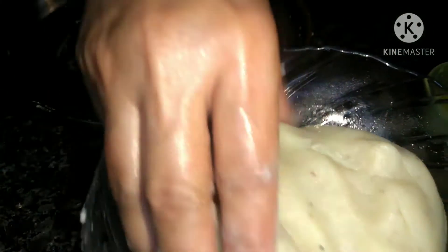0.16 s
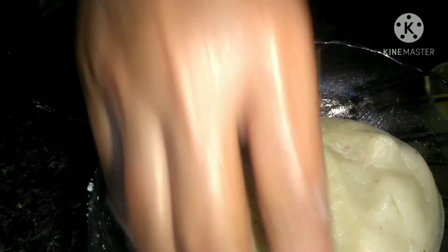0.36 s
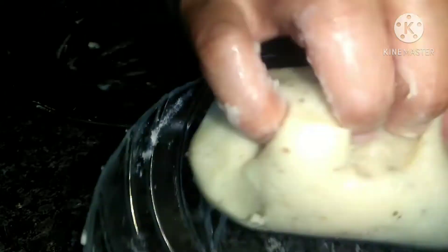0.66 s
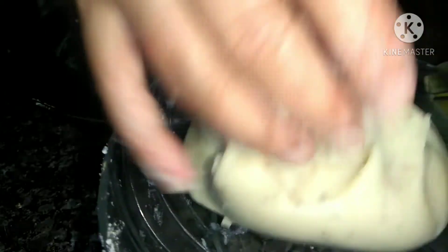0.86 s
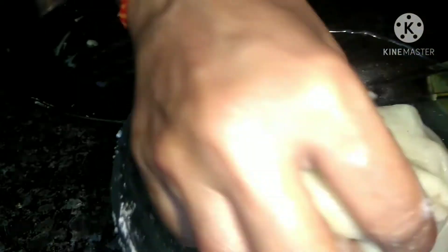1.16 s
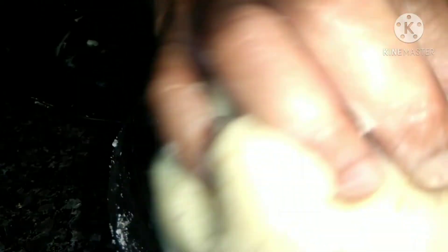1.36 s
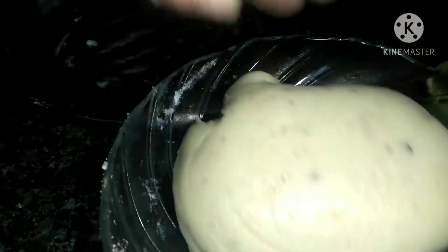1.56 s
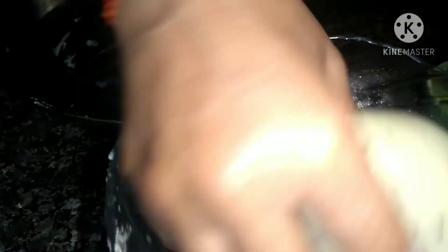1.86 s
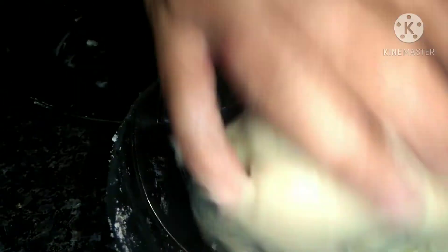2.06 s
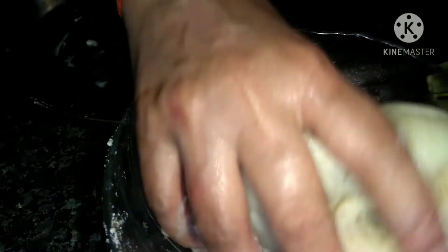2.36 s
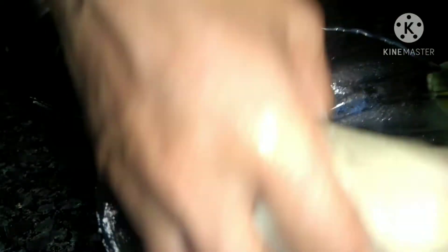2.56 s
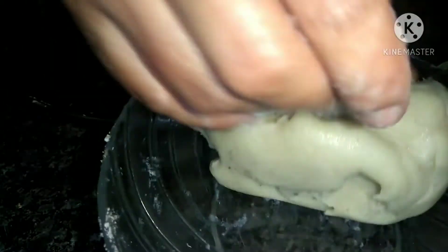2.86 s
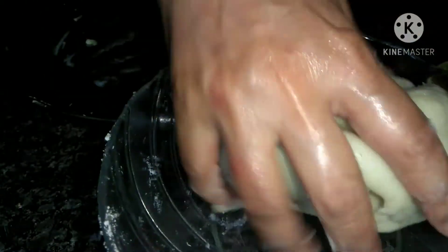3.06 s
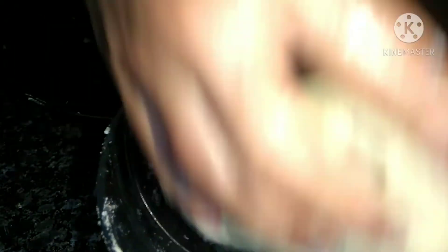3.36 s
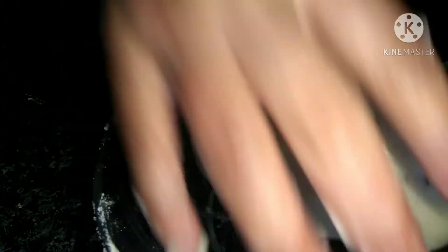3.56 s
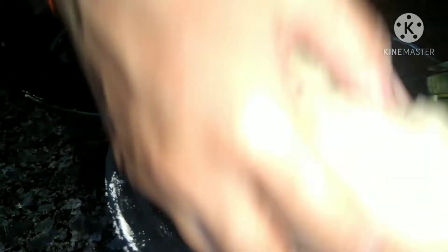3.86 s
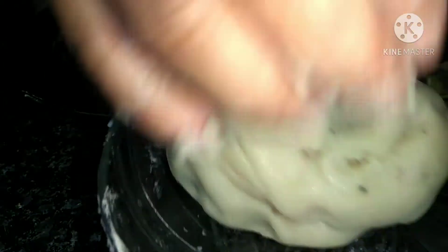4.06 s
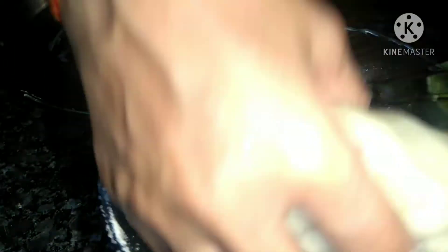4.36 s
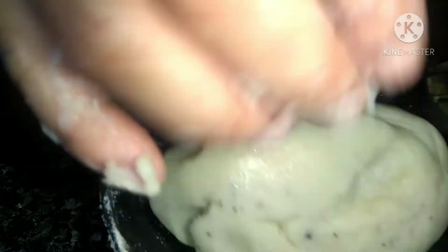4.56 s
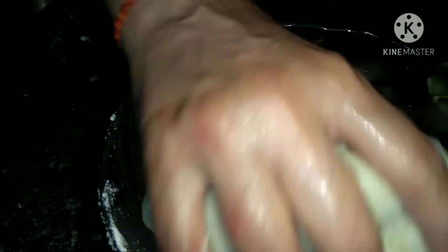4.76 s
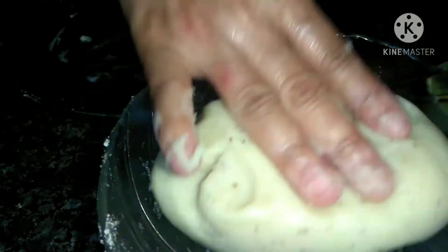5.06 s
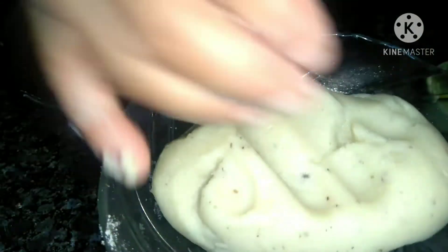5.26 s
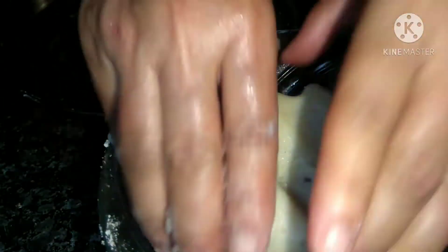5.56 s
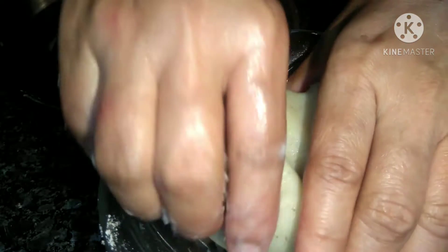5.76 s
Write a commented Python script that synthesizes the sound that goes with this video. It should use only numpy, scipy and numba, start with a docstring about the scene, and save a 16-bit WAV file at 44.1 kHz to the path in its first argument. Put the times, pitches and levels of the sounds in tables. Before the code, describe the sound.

Greased hands knead soft dough in a glass bowl on a hard counter. Irregular strokes bring clusters of short, hollow wet pops, squelches and a fine crackle of peeling skin, with quick glass ticks and faint high rings. Dull dough thumps land now and then. The microphone is very close in a small hard kitchen, and sound drops away between strokes.

```python
"""A greased hand kneads soft sticky dough in a glass bowl on a kitchen counter, close to a phone.
Each squeeze bursts small air pockets, skin peels off the dough with a fine wet crackle, and the bowl
knocks and rings briefly. A small hard room answers; the phone's noise gate shuts between strokes."""
import sys
import numpy as np
from scipy import signal
from scipy.fft import rfft, irfft
from scipy.io import wavfile
from scipy.ndimage import uniform_filter1d
from numba import njit

SR = 44100
rng = np.random.default_rng(int(sys.argv[2]) if len(sys.argv) > 2 else 0)


def wrap_up_sound(samples):
    """Save the sound to the file named by the first command line argument, as 16-bit audio."""
    columns = np.atleast_2d(samples).T
    # keep every value between -1 and 1, then stretch to whole-number steps
    tamed = np.clip(columns, -1, 1)
    steps = np.round(tamed * 32767).astype(np.int16)
    wavfile.write(sys.argv[1], SR, steps)


N = 261072

# air pockets bursting: (s, peak dB, cavity pitch Hz, ring length s)
POCKETS = [(0.272, -12, 1374, 0.0034), (0.305, -4, 1468, .0026), (0.599, -21.5, 1417, 0.0057), (0.705, -10.5, 1185, .007),
           (0.724, -19, 1144, 0.017), (0.7597, -2.5, 1384, 0.0034), (0.779, -6, 1540, .004), (0.8596, -4, 1385, 0.0091),
           (1.0303, -18.5, 1400, .004), (1.062, -13, 1440, 0.01), (1.196, -4.5, 1486, .005), (1.299, -1.5, 1395, 0.0028),
           (1.479, -9, 923, 0.0048), (1.5042, -6.5, 1920, 0.0062), (1.5253, -10.5, 1800, .003), (1.8572, -5.5, 1450, .006),
           (2, -15.5, 953, 0.0053), (2.0117, -11, 980, 0.0029), (2.035, -13.5, 1300, .0025), (2.1392, -7.5, 1460, 0.0021),
           (2.1746, -5, 1145, 0.0073), (2.556, -15.5, 1560, 0.0065), (2.686, -16, 1442, .008), (2.698, -3.5, 1630, .002),
           (2.7057, -7, 1500, .004), (2.878, -7, 1232, 0.0079), (3.1282, -12.5, 1510, .003), (3.2891, -2.5, 1198, 0.0057),
           (3.332, -11.5, 1070, 0.0034), (3.346, -10.5, 920, .009), (3.4813, -11.5, 1030, 0.0074), (3.557, -18, 1430, .0034),
           (3.7079, -2.5, 1447, 0.0046), (3.721, -10, 1555, 0.0045), (3.731, -18.5, 1500, 0.0043), (3.8353, -11.5, 1420, .006),
           (3.903, -2, 997, .007), (4.0682, -16, 1344, 0.0044), (4.097, -8.5, 1536, 0.0091), (4.1312, -6.5, 1500, 0.0024),
           (4.1658, -5, 1420, 0.0061), (4.2055, -6, 1850, 0.0043), (4.4246, -6.5, 1440, 0.0023), (4.4414, -2, 1597, 0.0041),
           (4.596, -4.5, 1557, 0.0035), (4.923, -17, 1340, .0022), (4.9585, -15.5, 910, 0.006), (4.9923, -10.5, 985, .006),
           (5.037, -9.5, 1455, 0.0063), (5.354, -34, 1448, 0.015), (5.867, -12.5, 1424, 0.015)]
# the bowl knocking: (s, peak dB, rim note dB against the peak)
CLINKS = [(0.3033, -19.5, -36), (0.853, -10.5, -20), (1.196, -10.5, -23), (1.2184, -14, -33), (1.3032, -15, -17.5),
          (1.5079, -15, -21), (1.8015, -26.5, -31), (1.8564, -14, -32.5), (2.0227, -17, -28), (2.175, -7.5, -32),
          (2.705, -7, -30.5), (2.9017, -17, -29), (3.2904, -18.5, -28.5), (3.352, -26, -18), (3.903, -9, -14.5), (4.163, -17.5, -31.5),
          (4.2029, -13.5, -28.5), (4.4508, -8, -10.5), (4.597, -18.5, -21)]
# the dough mass landing in the bowl: (s, peak dB, pitch of the hollow under it Hz, its dB)
THUDS = [(0.76, -20.5, 633, -36), (2.175, -18.5, 778, -24), (2.704, -17, 637, -28.5), (3.125, -30, 612, -33), (3.72, -15, 256, -30), (4.205, -17, 609, -27),
         (4.595, -22, 427, -44.5), (5.762, -27, 333, -48), (5.879, -21.5, 626, -29.5)]
# the rim's clear note: pitch (Hz), t60 (s)
RIM_HZ, RIM_T60 = 4660, 0.135  # fixed
# glass bowl, damped by the dough: (Hz, dB)
BOWL = [(1560, 1), (2640, -10.5), (3160, -8), (6880, -4), (8290, -8.5), (9250, -7.5), (10550, -5), (12300, -6.5)]
# colours: (Hz, dB per Hz)
PEEL = [(200, -15.5), (1500, -5.5), (3200, -3), (7000, -4), (9000, -1), (12500, 4.5), (15500, 2.5)]
SMACK = [(200, -30.5), (500, -9.5), (850, 0.5), (1600, 2), (2400, -3), (4000, -28), (12000, -34.5)]
THUD = [(25, -30), (80, -9), (170, -17.5), (255, -6), (430, -6), (620, 0), (800, -15), (2500, -49)]
TICK = [(100, -17), (500, -3.5), (2500, 8), (5500, 2), (8000, 1), (12000, 6.5), (15500, -6.5)]
QUIET = [(100, -8), (300, -1), (1200, -2), (5000, -19.5)]
# (Hz, left minus right dB)
PORTS = [(100, -4), (500, 0), (1400, -5), (3200, 1), (4700, -6), (7000, 0), (12000, 8.5), (15500, 3.5)]
TOP_HZ = 15600  # fixed
TIME = np.arange(N) / SR
# skin sliding and peeling off the dough: (start s, length s, dB)
PEELS = [(0.24, 0.0094, -39.5), (0.463, 0.059, -49.5), (0.604, 0.089, -27.5), (0.846, 0.032, -33), (0.976, 0.45, -49),
         (1.199, 0.068, -33), (1.49, 0.052, -41.5), (1.812, 0.5, -47), (2.547, 0.04, -34.5), (2.642, 0.15, -42), (2.8, 0.14, -47),
         (3.218, 0.3, -46), (3.644, 0.0067, -42), (3.814, 0.17, -39), (4.083, 0.17, -40.5), (4.339, 0.29, -44), (4.923, 0.14, -43), (5.24, 0.0538, -47), (5.777, 0.059, -52)]
# the hand squeezing folds of dough together: (s, dB)
SQUEEZES = [(0.295, -34.5), (0.705, -28.5), (0.78, -28.5), (0.87, -29.5), (1.201, -29), (2.188, -23.5), (2.554, -32), (2.665, -20.5),
            (2.71, -27), (2.883, -36), (3.314, -30), (4.445, -26.5), (4.605, -33.5), (5.007, -33), (5.756, -47)]
# a peel builds up, lasts while the skin moves, then dies away (s)
PEEL_ATTACK_S, PEEL_T60 = 0.011, 0.27
# a squeeze comes at once and eases as the dough gives way (s)
SQUEEZE_ATTACK_S, SQUEEZE_T60 = 0.039, 0.46
# dough dragging on the glass: (start s, length s, dB)
RUBS = [(2.579, 0.035, -33)]
# colour of the dragging dough: (Hz, dB per Hz)
RUB = [(330, -7), (950, 4), (1600, -7), (3100, 3), (4500, -13)]
# pitch at which the two hollows of a pocket are the same size (Hz)
EVEN_HZ = 1366


def undb(db):
    """Decibels to gain."""
    return 10 ** (np.asarray(db) / 20)


def unit(x):
    """Scale to rms 1."""
    return x / np.sqrt(np.mean(x ** 2))


def fade(t, t60):
    """Exponential decay, 60 dB down after t60."""
    return np.exp(-np.log(1000) * t / t60)


def add(track, s, sound):
    """Mix a sound in at time s."""
    i = max(int(s * SR), 0)
    track[..., i:i + sound.shape[-1]] += sound[..., :N - i]


def convolve(x, response):
    """Pass a sound through a response, keeping its length."""
    return signal.fftconvolve(np.atleast_2d(x), np.atleast_2d(response), axes=-1)[:, :x.shape[-1]]


def colour(x, points, size=2048):
    """Causal filter through (Hz, dB) points."""
    hz, db = np.transpose(points)
    gain = undb(np.interp(np.log(np.arange(size // 2 + 1) * SR / size + 1), np.log(hz), db))
    cepstrum = irfft(np.log(gain))
    cepstrum[1:size // 2] *= 2
    cepstrum[size // 2 + 1:] = 0
    return convolve(x, irfft(np.exp(rfft(cepstrum))))


def walk(rate):
    """Smooth random wandering, spread near 1."""
    knots = rng.standard_normal(N // 20)
    return np.interp(TIME * rate, np.arange(len(knots)), knots)


def pair(apart, size):
    """Noise at the two microphones, partly alike."""
    mid, side = rng.standard_normal((2, size))
    return (mid + apart * np.array([side, -side])) / np.hypot(1, apart)


def crackle(rate, spread_db, apart):
    """Tiny ruptures of the sticky film: many faint, a few strong."""
    size = undb(spread_db * np.minimum(rng.exponential(size=N), 5))
    return (rng.random(N) < rate / SR) * size * pair(apart, size=N)


def pops(attack_s=0.00065, rise=0.05, ring_db=-6.0, partner_db=-8, smack_db=-14.0, smack_s=0.0017, smack_growth=1.07, next_db=-7.0, next_ring_s=0.0033, spacing=0.59, scatter=0.28, count=4):
    """Each pocket opens with a smack and rings in two hollows, one small where the other is large,
    rising as it empties; smaller neighbours burst after it in a chain."""
    out, t = np.zeros((2, N)), TIME[:SR // 20]
    for s, db, hz, length in POCKETS:
        for k, (bend, detune, side, wait) in enumerate(rng.standard_normal((count, 4))):
            ring_s = next_ring_s if k else length
            shape = np.minimum(t / attack_s, 1) * np.exp(-(t / ring_s) ** 2)
            pitch = hz * np.exp(scatter * detune * min(k, 1)) * (1 + rise * (1 + bend) * np.tanh(2 * t / ring_s - 1))
            ring = tone(pitch) + undb(partner_db) * tone(EVEN_HZ ** 2 / pitch)
            place = undb(db + ring_db + np.sqrt(k) * next_db + np.array([[side], [-side]]))
            add(out, s, place * ring * shape)
            s += spacing * length * np.exp(wait / 2)
    # harder bursts are noisier, gentle ones nearly a pure blip
    return out + bursts([(s, smack_db + smack_growth * db) for s, db, _, _ in POCKETS], smack_s, SMACK, apart=0.53)


def knocks(tick_db=-4, tick_s=0.002, glass_db=-28, t60=0.15, rim_db=-4, chatter_db=3, detune=0.0037, apart=0.89, count=3):
    """The bowl chatters on the counter; the shifting dough detunes and reweights its clusters of modes at every knock."""
    out, t = np.zeros((2, N)), TIME[:SR // 6]
    hz, mode_db = np.transpose(np.repeat(BOWL, count, axis=0))[:, :, None]
    decays = undb(mode_db) * fade(t, t60)
    for s, db, rim_note_db in CLINKS:
        modes = decays * np.sin(2 * np.pi * hz * (1 + detune * rng.standard_normal(hz.shape)) * t)
        glass = undb(glass_db) * pair(apart, size=len(hz)) @ modes
        rim = undb(rim_db + rim_note_db) * np.sin(2 * np.pi * RIM_HZ * t) * fade(t, RIM_T60)
        chatter = undb(chatter_db * walk(200)[:len(t)])  # the rim's note trembles as the dough damps it unevenly
        add(out, s, undb(db) * (glass + rim * chatter))
    return out + in_bowl(bursts([(s, db + tick_db) for s, db, _ in CLINKS], tick_s, TICK, apart), width_hz=300, direct_db=-10.5)


def thuds(peak_s=0.0035, thud_db=-16, hollow_s=0.022, sag_hz=130):
    """Soft dough meets the bowl: a dull push, and the hollow under it gives a short gulp that sags in pitch."""
    out = undb(thud_db) * bursts([row[:2] for row in THUDS], peak_s, THUD, apart=0.12)
    along = np.linspace(0, 1, int(hollow_s * SR))
    for s, _, hz, hollow_db in THUDS:
        add(out, s, undb(hollow_db) * tone(hz + sag_hz * (.5 - along)) * np.sin(np.pi * np.sqrt(along)))
    return out


def hand(squelch_db=-6, squelch_flutter_db=4.0, low_fold_hz=950, high_fold_hz=1480, fold_width_hz=150, fold_shift=0.13, open_db=-9):
    """Oily skin peels off in a fine fizz, while squeezed folds squelch through two hollows that keep changing shape."""
    peeling = np.sqrt(sum(stroke(s, db, length, PEEL_ATTACK_S, PEEL_T60) ** 2 for s, length, db in PEELS))
    squeezing = np.sqrt(sum(stroke(s, db, SQUEEZE_ATTACK_S, SQUEEZE_ATTACK_S, SQUEEZE_T60) ** 2 for s, db in SQUEEZES))
    film = colour(crackle(rate=6200, spread_db=1.5, apart=0.94), PEEL)
    fizz = unit(in_bowl(film, width_hz=130, direct_db=-8))
    wet = colour(crackle(rate=1100, spread_db=2.0, apart=1.0), SMACK)
    squelch = unit(undb(open_db) * wet + sum(cavity(wet, hz * np.exp(fold_shift * walk(30)), fold_width_hz) for hz in (low_fold_hz, high_fold_hz)))
    return (fizz * peeling * undb(walk(110) + 2 * walk(20))
            + squelch * squeezing * undb(squelch_db + squelch_flutter_db * walk(94)))


def echoes(x, delay_s, t60, db, apart):
    """A dense, fading cloud of reflections."""
    t = TIME[:SR]
    response = pair(apart, size=SR) * fade(t, t60) * np.clip(t / delay_s - 1, 0, 1)
    return undb(db) * convolve(x, unit(response) / np.sqrt(SR))


def swell(t, peak_s):
    """Rises to 1 at peak_s and dies away."""
    return t / peak_s * np.exp(1 - t / peak_s)


def loudness(x, window_s):
    """Running level in dB."""
    return 10 * np.log10(np.abs(uniform_filter1d(np.mean(x ** 2, axis=0), int(window_s * SR))) + 1e-12)


def limiter(x, ceiling_db=-5.5):
    """Flattens the loudest bursts."""
    return np.clip(x * undb(np.minimum(ceiling_db - loudness(x, window_s=0.00037), 0)), -1, 1)


def bursts(rows, peak_s, spectrum, apart):
    """A short swell of coloured noise at each (s, dB)."""
    envelope = np.zeros(N)
    for s, db in rows:
        add(envelope, s, undb(db) * swell(TIME[:SR // 10], peak_s))
    return envelope * unit(colour(pair(apart, size=N), spectrum))


def stroke(s, db, length_s, attack_s, t60):
    """Strength of one movement of the hand: attack, hold, release."""
    out, t = np.zeros(N), TIME[:SR]
    add(out, s, undb(db) * np.minimum(t / attack_s, 1) * fade(np.maximum(t - length_s, 0), t60))
    return out


@njit
def resonate(x, hz, width):
    """Band-pass whose centre may move from sample to sample."""
    y, b, l = np.empty(len(x)), 0., 0.
    for i in range(len(x)):
        g, k = np.tan(np.pi * hz[i] / SR), width / hz[i]
        v = (b + g * (x[i] + 1e-18 - l)) / (1 + g * (g + k))
        b, l, y[i] = 2 * v - b, l + 2 * g * v, k * v
    return y


def cavity(x, hz, width_hz):
    """One moving resonance, heard at both microphones."""
    return np.array([resonate(side, hz, float(width_hz)) for side in x])


def snaps(snap_db=-20.5, snap_s=0.00018, growth=1.1):
    """The film over each pocket tears with a crisp click."""
    return bursts([(s, snap_db + growth * db) for s, db, _, _ in POCKETS], snap_s, TICK, apart=1.0)




def rubs(slip_hz=530, jitter=0.15, attack_s=0.0087, t60=0.32, flutter_db=4):
    """Dough sticks and slips along the glass: a fast, uneven train of jerks that rasps and flutters."""
    slips = np.floor(np.cumsum(slip_hz * np.exp(jitter * walk(slip_hz))) / SR)
    jerks = np.diff(slips, prepend=0) * (1 + .5 * pair(1, size=N))
    rasp = unit(colour(jerks - jerks.mean(), RUB))
    return rasp * sum(stroke(s, db, length, attack_s, t60) for s, length, db in RUBS) * undb(flutter_db * walk(220))


def in_bowl(x, width_hz, direct_db):
    """Sounds made on the glass take on the colour of its modes."""
    return undb(direct_db) * x + body(x, BOWL, width_hz)


def body(x, modes, width_hz):
    """Fixed, damped resonances at (Hz, dB), all of one width."""
    t = TIME[:SR // 20]
    ring = sum(undb(db) * np.cos(2 * np.pi * hz * t) for hz, db in modes)
    return convolve(x, 2 * np.pi * width_hz / SR * ring * np.exp(-np.pi * width_hz * t))


def tone(hz):
    """A sine that follows a pitch curve."""
    return np.sin(2 * np.pi * np.cumsum(hz) / SR)


def scene():
    """The strokes echo first from bowl and counter, then, duller, from the kitchen walls."""
    near = pops() + snaps() + knocks() + thuds() + hand() + rubs()
    near = near + echoes(near, delay_s=0.0034, t60=0.066, db=-8.5, apart=1.0)
    room = colour(echoes(near, delay_s=0.0072, t60=0.28, db=-13.5, apart=0.51), [(2000, 0), (8000, -5.5)])
    return near + room + undb(-54.5) * unit(colour(pair(0.69, size=N), QUIET))


def gate(x, open_db=-49, knee_db=3, depth_db=22, makeup_db=4.5):
    """Turns the sound down when its own level sinks under a threshold."""
    shut = (1 - np.tanh((loudness(x, window_s=0.03) - open_db) / knee_db)) / 2
    return x * undb(makeup_db - depth_db * shut)


def record(dry):
    """Two unlike microphone ports, the left a little further off; noise gate, limiter and a steep top cut."""
    left = colour(np.pad(dry[0], (7, 0))[:N], [(hz, db / 2) for hz, db in PORTS])  # fixed
    right = colour(dry[1], [(hz, -db / 2) for hz, db in PORTS])
    sound = limiter(gate(np.vstack([left, right])))
    return signal.sosfilt(signal.ellip(10, .2, 80, TOP_HZ, fs=SR, output="sos"), sound)  # fixed


dry = scene()
out = record(dry)
wrap_up_sound(out)
```